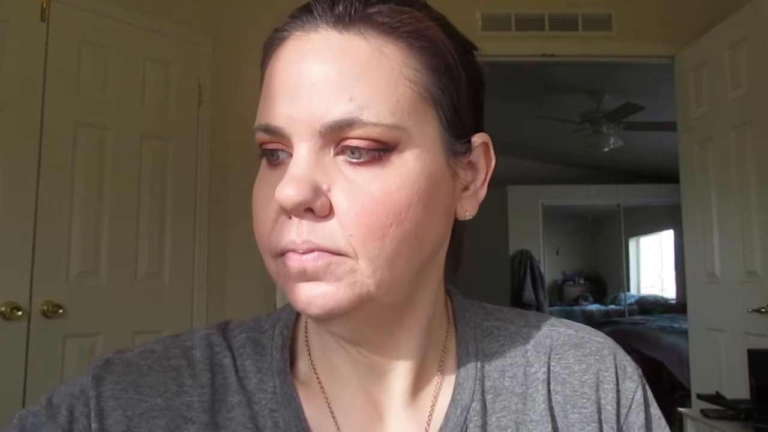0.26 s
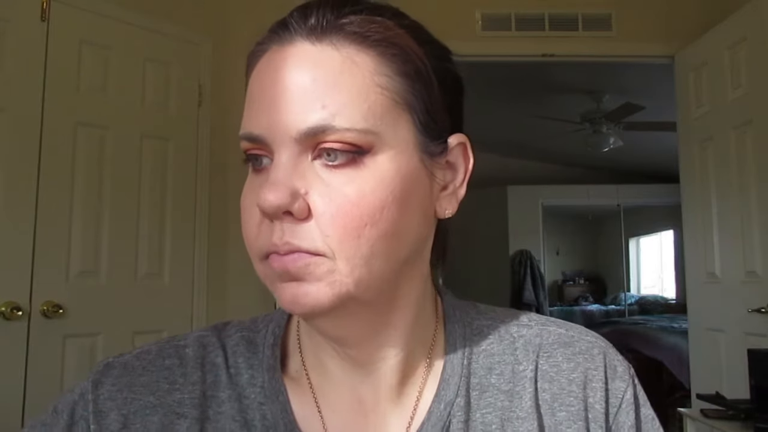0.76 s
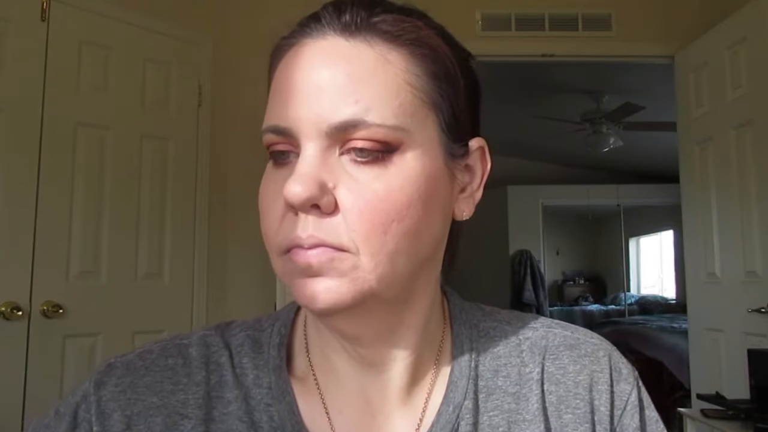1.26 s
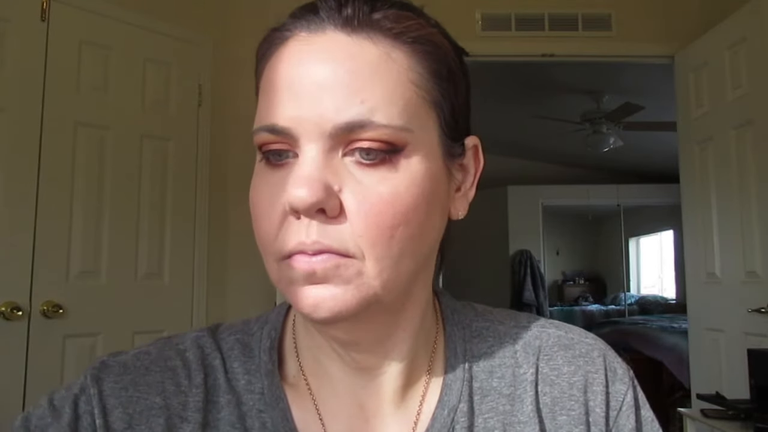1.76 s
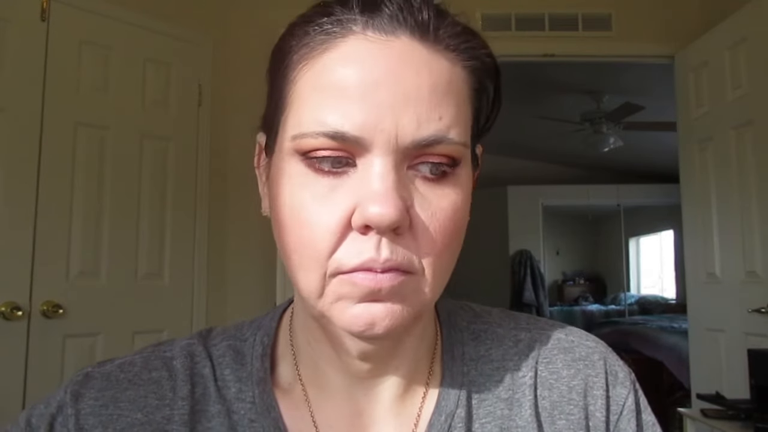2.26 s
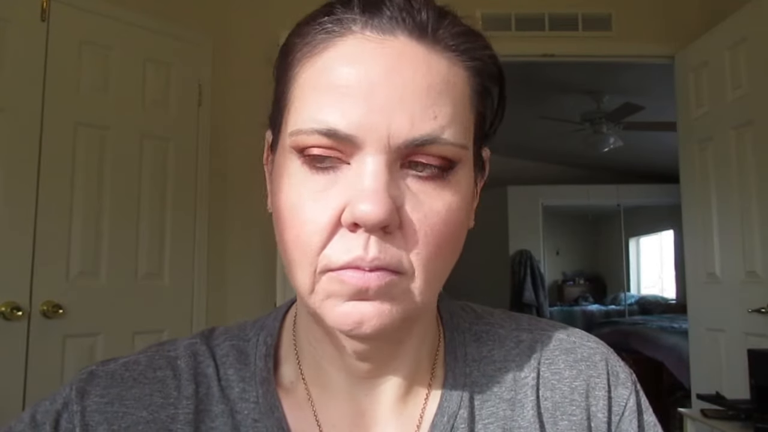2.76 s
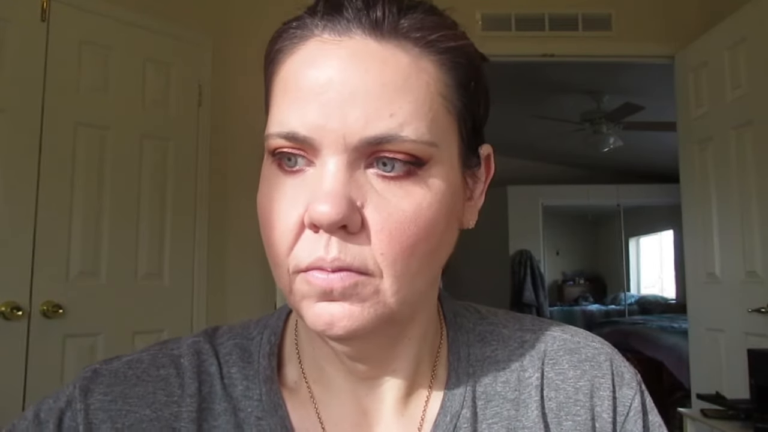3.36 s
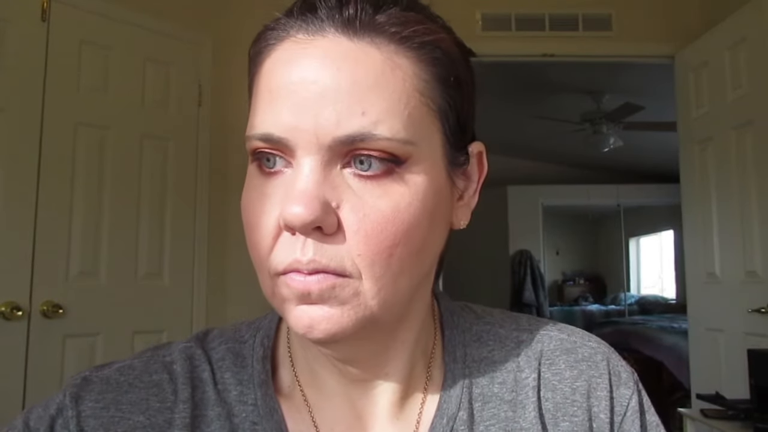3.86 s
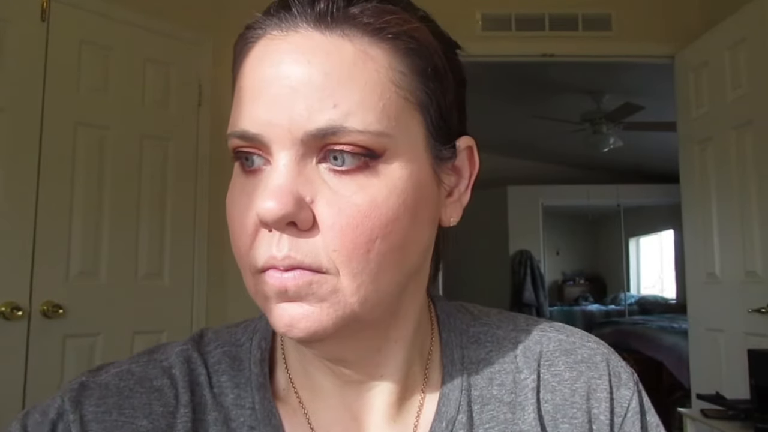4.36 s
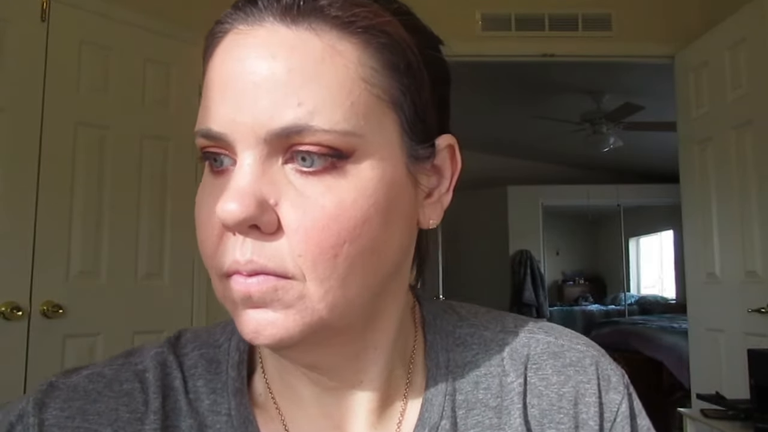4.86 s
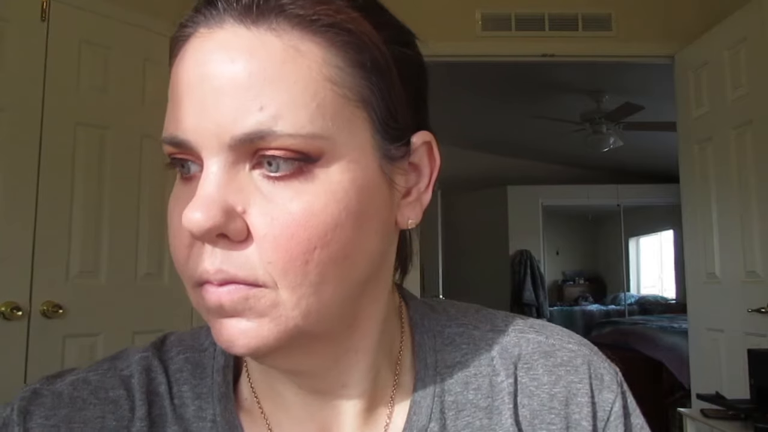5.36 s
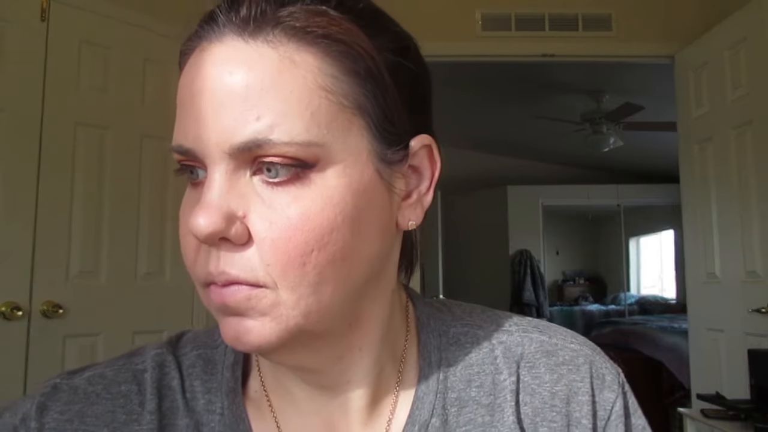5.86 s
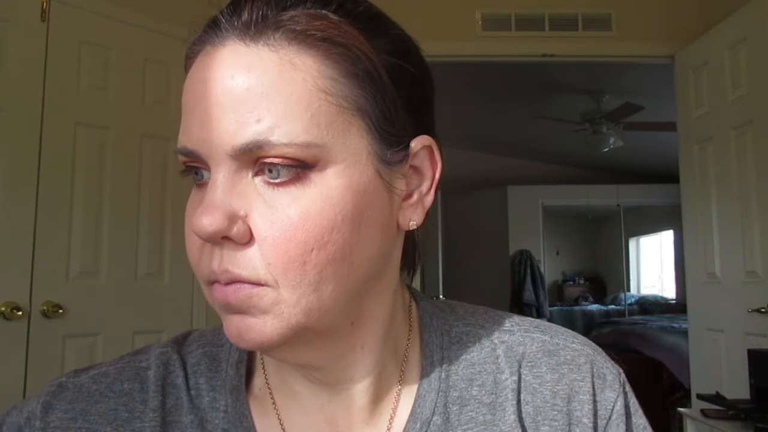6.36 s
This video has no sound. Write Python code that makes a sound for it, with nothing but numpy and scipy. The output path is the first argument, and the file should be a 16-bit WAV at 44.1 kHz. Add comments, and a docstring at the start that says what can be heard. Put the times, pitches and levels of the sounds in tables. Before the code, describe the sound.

Loud hollow clacks at once, a pause, then a busy clattering rummage of little cases, thinning into soft scrapes and faint taps.

```python
"""Rummaging in a tray of small containers

A hand rummages among small plastic and metal containers in a tray on a table, in a quiet furnished room.
Knocks set decaying modes and notes ringing; noise bursts add sharp ticks and a short buzz.
Sliding is a train of small slips through the same modes, with a dry noise hiss on top.
A small microphone with gain control hears it close up, over the echo, faint air and mains hum of the room."""
import sys
import numpy as np
from scipy import signal
from scipy.fft import rfft, irfft, next_fast_len
from scipy.io import wavfile
from scipy.ndimage import uniform_filter1d

SR = 44100
rng = np.random.default_rng(int(sys.argv[2]) if len(sys.argv) > 2 else 0)


def ratio_of_db(decibels):
    """Turn decibels (scalar or array-like) into linear amplitude factors; 0 dB maps to 1."""
    return 10 ** (np.asarray(decibels, float) / 20)


def unload_audio(sound):
    """Save the sound as a 16-bit wav file, at the path given as the first command line argument."""
    columns = np.transpose(np.atleast_2d(sound))
    # keep every value between -1 and 1, then stretch to whole-number steps
    steps = np.round(np.clip(columns, -1, 1) * 32767)
    wavfile.write(sys.argv[1], SR, steps.astype(np.int16))


N = 291093  # samples

# knocks of container on container or tray: start_s, peak_db, pitch_hz of the struck container,
# then re peak: thud_db of the tray, clack_db of the shells, tick_db of the hard contact
KNOCKS = [(0.048, -8.5, 586, -31, -4.5, -17), (0.063, 0.5, 584, -18, -7.5, -24.5),
          (0.088, -9.5, 554, -22, -10, -40), (0.104, -6, 735, -28, -4, -15),
          (0.208, -10.5, 707, -28, -6, -17.5), (0.288, -35.5, 275, 0, -9, -23),
          (0.518, -50, 234, 3, -3, -8), (0.687, -45, 585, -4, 1, -17), (0.77, -42, 178, -4, -15, -28),
          (0.794, -30.5, 348, -5, -19, -27), (0.931, -31.5, 343, -6, -18.5, -29),
          (1.572, -20, 1545, -30, 8, -0.5), (1.581, -7.5, 1580, -50, -16, -59),
          (1.822, -4, 281, -10, -7, -30.5), (1.887, -14, 610, -14.5, -18, -4),
          (1.923, -8, 735, -11, -1.5, -24), (1.972, -5.5, 813, -32, -2.5, -18),
          (1.988, -9.5, 603, -18, -10, -30), (2.176, -30.5, 585, -13, -6.5, -10),
          (2.301, -39, 580, -14, -3, -10.5), (2.347, -29.5, 587, -8.5, -3.5, -20),
          (2.464, -16, 560, -26, 1, -15), (2.536, -35.5, 610, -6, 3, -30), (2.61, -31.5, 574, -6, -8, -32),
          (2.691, -21.5, 573, -9, -8.5, -23.5), (2.783, -31.5, 685, -5, -11, -35),
          (2.873, -36, 821, -6, -3, -18), (2.886, -23, 600, -6, -8.5, -14),
          (2.96, -22.5, 726, -18, -8.5, -31), (3.03, -7, 530, -1.5, -39, -13.5),
          (3.083, -17, 719, -3.5, -5, -19), (3.112, -14, 789, -24, -1, -29),
          (3.117, -11.5, 752, -21, -7.5, -25.5), (3.166, -14, 623, -10, -9, -33),
          (3.214, -34, 700, -15, -14, -23), (3.276, -19.5, 750, -3, -11, -55),
          (3.325, -11.5, 259, -10, -13, -28.5), (3.346, -15.5, 573, -13, -3, -21.5),
          (3.366, -15, 646, -29, -13, -37), (3.412, -17.5, 609, -19, -9, -32),
          (3.66, -14.5, 577, -6.5, -11.5, -33), (3.708, -17.5, 605, -0.5, -28, -53),
          (3.725, -11, 291, -3.5, -12.5, -33), (3.771, -11, 564, -8, -13, -28),
          (3.787, -10, 890, -22, -3, -21), (3.804, -13, 796, -19, -15, -26),
          (3.858, -25, 1079, -12, 0, -17.5), (4.126, -18, 573, -8, -16, -23),
          (4.135, -16, 602, -5.5, -4.5, -38), (4.297, -8, 335, -11.5, -19, -31),
          (4.31, -16.5, 595, -7.5, -5, -26.5), (4.338, -19, 261, -11, -18, -35),
          (4.893, -33, 392, -6.5, -30, -12), (5.25, -27, 961, -9.5, -9, -18),
          (5.274, -27, 533, -10, 3, -14.5), (5.283, -25.5, 1696, -7.5, -5, -16.5),
          (5.308, -29.5, 1723, -24, -0.5, -19), (5.532, -19.5, 548, -4.5, -1, -19.5),
          (5.558, -18.5, 610, -6, -9, -30), (5.585, -23, 248, -7, -3, -27),
          (5.686, -25.5, 820, -18, -15, -34), (5.714, -21.5, 690, -13, -13, -41),
          (5.85, -35, 670, -21, -1, -16), (6.308, -41.5, 208, -2.5, -6, -12),
          (6.401, -32.5, 283, -5, -13, -21), (6.534, -34, 617, -6.5, -17, -35),
          (6.578, -43.5, 225, -6, 2.5, -29)]
# resonances of the tray and the containers in it: mode_hz, level_db, t60_s
BODY_MODES = [(189.8, -12.5, 0.16), (221.6, -2.5, 0.039), (264, -6, 0.026), (279, -1.5, 0.041),
              (329, 0.5, 0.013), (413, -14, 0.02), (475.4, -4, 0.047), (555.6, -9, 0.056),
              (591, -2.5, 0.08), (665, -6.5, 0.046), (678, -7, 0.035), (706, -1.5, 0.061),
              (789, -1.5, 0.037), (894, -3.5, 0.031), (918, 1.5, 0.03), (1044, 1.5, 0.022),
              (1147, -3, 0.055), (1278, -4.5, 0.058), (1378, -5, 0.038), (1501, -4.5, 0.047),
              (1614, -14, 0.13), (1773, -5.5, 0.028), (1943, -2.5, 0.016), (2151, -3.5, 0.028),
              (2320, -4, 0.031), (2504, -9, 0.069), (2590, -13, 0.052), (3032, -4.5, 0.019),
              (3390, -9, 0.022), (3620, -8.5, 0.022), (4360, -7.5, 0.011)]
CONTACT_S = 0.00125  # time constant of a blow's build-up
HOLLOW_DB = -3.5  # hollow body, re peak


def rms_one(x):
    """Scale to rms 1."""
    return x / np.sqrt(np.mean(x ** 2) + 1e-20)


def at_hz(points, hz):
    """Read a table of (Hz, value) on a log-frequency axis."""
    table_hz, values = np.array(points).T
    return np.interp(np.log(np.maximum(hz, 1)), np.log(table_hz), values)


def coloured(spectrum):
    """Noise of rms 1 with the given spectrum (Hz, relative dB per Hz)."""
    size = next_fast_len(N)
    white = rfft(rng.standard_normal(size))
    gain = ratio_of_db(at_hz(spectrum, np.fft.rfftfreq(size, 1 / SR)))
    return rms_one(irfft(white * gain, size)[:N])


def drift(rate_hz):
    """Slow random wander of rms 1: noise through a double one-pole low-pass."""
    r = np.exp(-2 * np.pi * rate_hz / SR)
    wander = signal.lfilter([1], [1, -2 * r, r * r], rng.standard_normal(N + SR))
    return rms_one(wander[SR:])  # the first second lets the filter settle


def fading(x, fade_s):
    """Each click starts an exponential decay with time constant fade_s."""
    return signal.lfilter([1], [1, -np.exp(-1 / (fade_s * SR))], x)


def ring(clicks, hz, t60):
    """A damped resonator: a unit click starts a decaying sine of height 1."""
    r = ratio_of_db(-60 / (t60 * SR))
    w = 2 * np.pi * hz / SR
    return signal.lfilter([0, np.sin(w)], [1, -2 * r * np.cos(w), r * r], clicks + 1e-18)


def softly(clicks, hz):
    """Spread each click over the contact time, in step with the mode it drives."""
    return 2 / (CONTACT_S * SR) * ring(clicks, hz, np.log(1000) * CONTACT_S)


def strikes(level_db):
    """One click per knock, at the given levels."""
    clicks = np.zeros(N)
    start = (np.array(KNOCKS)[:, 0] * SR).astype(int)
    np.add.at(clicks, start, ratio_of_db(level_db))
    return clicks


def room_air():
    """The faint steady noise of the quiet room."""
    # spectrum of the room's noise: hz, relative level_db per Hz
    air_spectrum = [(15, -51), (25, -43), (49, 3), (86, -16), (183, 2), (313, -7.5), (349, -2.5),
                    (741, -8.5), (919, -9), (1200, -11.5), (1850, -11.5), (3090, -19), (9550, -23),
                    (14300, -30.5), (15500, -40)]
    return ratio_of_db(-50) * coloured(air_spectrum)


def mains_hum():
    """A faint 118 Hz sine whose level wanders a little."""
    level_db = -62.5 + 2.3 * drift(1.1)
    return ratio_of_db(level_db) * np.sin(2 * np.pi * 118 * np.arange(N) / SR)


def room_echo(x):
    """Diffuse echo: half-octave noise bands, each dying at its own rate, swelling in over milliseconds."""
    # decay time of the furnished room: hz, t60_s
    echo_t60 = [(100, 0.41), (300, 0.39), (800, 0.31), (2000, 0.38), (5000, .28), (13000, 0.095)]
    t = np.arange(SR // 2) / SR
    echo = np.zeros(len(t))
    for hz in 62.5 * 2 ** np.arange(0, 8.1, 0.5):
        band = signal.butter(2, [hz / 2 ** 0.25, hz * 2 ** 0.25], "band", fs=SR, output="sos")
        noise = signal.sosfilt(band, rng.standard_normal(len(t)))
        echo += noise * ratio_of_db(-60 * t / at_hz(echo_t60, hz))
    echo *= 1 - np.exp(-(t / 0.0026) ** 2)
    echo /= np.sqrt(np.sum(echo ** 2))
    return signal.fftconvolve(x, echo)[:N]


def table_shudder(handled):
    """The table shudders faintly while it is handled: low noise following the handling's loudness."""
    loudness = fading(np.abs(handled), 0.1) / (0.1 * SR)
    low_noise = coloured([(30, -10), (60, 0), (110, 17.5), (150, -21), (300, -60)])
    return ratio_of_db(-35) * loudness ** 0.65 * low_noise


def slides():
    """Uneven contacts rumble through tray and containers; the rubbing surfaces hiss."""
    # sliding and jostling, one table per movement of the hand, levels ahead of their flutter:
    # time_s, rumble_db through the tray, hiss_db of the surfaces
    movements = [
        [(0.0, -26, -40.5), (0.07, -45.5, -56), (0.132, -16, -40), (0.2, -27, -46), (0.3, -32, -60),
         (0.45, -70, -79)],
        [(0.62, -77, -71), (0.756, -46, -50), (0.9, -70, -74)],
        [(1.55, -80, -81), (1.62, -36, -45), (1.8, -42, -56), (2.0, -29, -56), (2.15, -45, -43.5),
         (2.26, -64, -62), (2.43, -45.5, -85), (2.94, -54, -66), (3.04, -37.5, -51), (3.22, -39, -63),
         (3.29, -33, -47), (3.45, -60, -54), (3.64, -48, -51.5), (3.73, -22, -39), (3.83, -35, -35.5),
         (3.95, -28, -33.5), (4.1, -37, -34), (4.21, -38, -36), (4.28, -48, -42), (4.35, -26, -46),
         (4.42, -47, -56), (4.55, -59, -61)],
        [(4.85, -61, -59), (5.248, -68, -74), (5.308, -33, -41.5), (5.43, -53, -47.5), (5.498, -42.5, -42.5),
         (5.712, -38, -44.5), (5.844, -49, -47), (6.096, -44, -46.5), (6.282, -49, -50.5), (6.444, -39.5, -48),
         (6.6, -73, -104)],
    ]
    # spectrum of dry rubbing: hz, relative level_db per Hz
    hiss_spectrum = [(1470, 2.5), (2500, -2.5), (2710, 1.5), (3130, -2.5), (4100, -6.5), (6060, -4),
                     (11500, -11.5), (15000, -19)]
    t = np.arange(N) / SR
    rumble_level, hiss_level = np.zeros((2, N))
    for movement in movements:
        time_s, rumble_db, hiss_db = np.transpose(movement)
        rumble_level += ratio_of_db(np.interp(t, time_s, rumble_db, -120, -120))
        hiss_level += ratio_of_db(np.interp(t, time_s, hiss_db, -120, -120))

    # one train of about 1000 small slips a second, felt by each mode with its own strength
    slip_db = 5.4 * np.minimum(rng.exponential(1, N), 4)
    slips = (rng.random(N) < 1000 / SR) * ratio_of_db(slip_db)
    body = np.zeros(N)
    for hz, db, t60 in BODY_MODES:
        push = softly(slips * rng.standard_normal(N), hz)
        body += ratio_of_db(db - 0.3 * np.log2(hz / 600)) * ring(push, hz, t60)

    rumble = rumble_level * ratio_of_db(0.47 * drift(33)) * rms_one(body)
    sway_db = 1.0 * drift(2.5) + 0.73 * drift(90)
    return rumble + hiss_level * ratio_of_db(sway_db) * coloured(hiss_spectrum)


def struck_bodies():
    """Each blow drives all modes of tray and containers; loose parts chatter on for a moment."""
    _, peak_db, pitch_hz, thud_db, clack_db, tick_db = np.transpose(KNOCKS)
    snap_db = -2 + 0.39 * tick_db + 0.61 * clack_db  # the snap lies between clack and tick
    luck_db = 2.2 * rng.standard_normal((len(KNOCKS), len(BODY_MODES)))
    touches = rng.random(N) < 500 / SR
    force_hz = (350, 520, 900, 1100, 2000, 2400, 3600, 5000)
    out = np.zeros(N)
    for k, (hz, db, t60) in enumerate(BODY_MODES):
        # a blow's force spectrum runs from thud over hollow, clack and snap to tick
        force_db = []
        for thud, clack, snap, tick in zip(thud_db, clack_db, snap_db, tick_db):
            levels = (thud + 9, HOLLOW_DB, HOLLOW_DB, clack - 1.5, clack + 2.6, snap, snap, tick + 13)
            force_db.append(at_hz(list(zip(force_hz, levels)), hz))
        # modes near the struck container's pitch take more of the blow
        near_pitch = np.exp(-(np.log2(hz / pitch_hz) / 0.13) ** 2)
        blow_db = peak_db + np.array(force_db) + 0.96 * near_pitch - 3 + db + luck_db[:, k]
        # harder contacts set off more chatter
        chatter_db = blow_db - 5.5 + 0.21 * tick_db
        chatter = fading(strikes(chatter_db), 0.022) * touches * rng.standard_normal(N)
        blows = (-1) ** k * strikes(blow_db)
        out += ring(softly(blows + chatter, hz), hz, t60)
    return out


def container_notes():
    """The struck container's own note: a decaying sine at its pitch, with a soft start."""
    start_s, peak_db, pitch_hz, thud_db, clack_db, _ = np.transpose(KNOCKS)
    # ring time of the own note of large, middle and small containers: t60_s
    note_t60 = (0.07, 0.047, 0.066)
    register = np.digitize(pitch_hz, [420, 1000])  # large, middle, small
    hollow_db = np.full(len(KNOCKS), HOLLOW_DB)
    note_db = peak_db + np.choose(register, [thud_db + 9.5, hollow_db + 6, clack_db + 7.5])
    t = np.arange(SR // 5) / SR
    rise = 1 - np.exp(-(t / 0.0012) ** 2)
    out = np.zeros(N)
    starts = (start_s * SR).astype(int)
    for start, hz, db, t60 in zip(starts, pitch_hz, note_db, np.take(note_t60, register)):
        note = ratio_of_db(db - 60 * t / t60) * rise * np.sin(2 * np.pi * hz * t)
        out[start:start + len(t)] += note[:N - start]
    return out


def hard_contacts():
    """A sharp crack of noise, and loose contents buzzing on a little longer."""
    # spectrum of the crack: hz, relative level_db per Hz
    crack_spectrum = [(1500, -16), (3000, -3), (7500, 9), (12000, 2.5), (15000, -9.5)]
    # spectrum of the buzz: hz, relative level_db per Hz
    buzz_spectrum = [(1470, 5), (2500, 6), (3830, -1), (4690, -5), (6930, -5), (7470, -6), (12100, -15),
                     (13200, -12), (15000, -26.5)]
    _, peak_db, _, _, _, tick_db = np.transpose(KNOCKS)
    hits = np.roll(strikes(peak_db + tick_db), round(CONTACT_S * SR))  # once the blow has built up
    crack = fading(hits, 0.0014) * coloured(crack_spectrum)
    buzz = fading(hits, 0.026) * coloured(buzz_spectrum)
    return ratio_of_db(5) * crack + ratio_of_db(6) * buzz


def knocks():
    """Containers knocking: ringing bodies, the struck container's own note and the hard contact."""
    return struck_bodies() + container_notes() + hard_contacts()


def scene():
    """Containers close to the microphone, their echo in the room, the room's air and hum."""
    near = knocks()
    handled = near + ratio_of_db(-9) * room_echo(near) + slides()
    # the small microphone picks up no deep bass
    handled = signal.sosfilt(signal.butter(4, 155, "high", fs=SR, output="sos"), handled)
    return (handled + table_shudder(handled) + room_air() + mains_hum())[None]


def low_pass(x):
    """Removes everything above the highest recorded frequency."""
    return signal.sosfilt(signal.butter(12, 15960, fs=SR, output="sos"), x)


def record(dry):
    """Gain control ducks after loud knocks and creeps back; peaks are rounded and the top is cut."""
    power = uniform_filter1d(dry[0] ** 2, size=441)  # over 10 ms
    level_db = 10 * np.log10(power + 1e-12)
    cut_db = 0.43 * np.maximum(level_db + 19.5, 0)
    # the deepest cut so far is held and let go at 3.17 dB per second
    release_db = 3.17 * np.arange(N) / SR
    held_db = np.maximum(np.maximum.accumulate(cut_db + release_db) - release_db, 0)
    # the gain follows a few milliseconds late, so the first peak of a knock gets through
    late_db = signal.lfilter(np.ones(441) / 441, [1], held_db)
    rounded = 1.6 * np.tanh(dry * ratio_of_db(-late_db) / 1.6)
    top_cut = signal.cheby2(14, 50, 15900, fs=SR, output="sos")
    return low_pass(signal.sosfilt(top_cut, rounded))


dry = scene()
out = record(dry)
unload_audio(out)
```